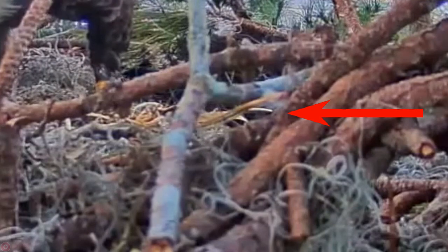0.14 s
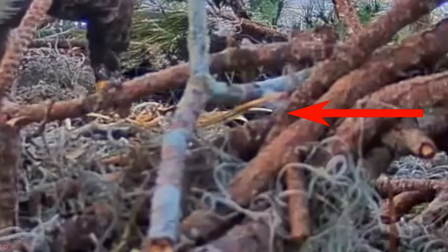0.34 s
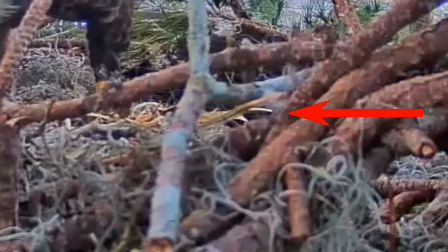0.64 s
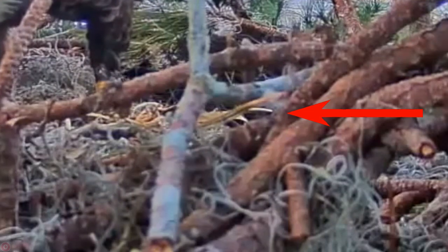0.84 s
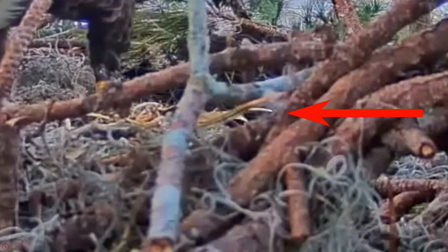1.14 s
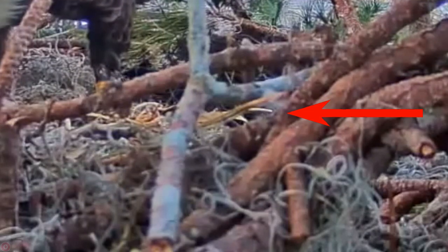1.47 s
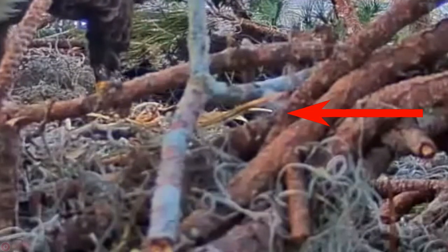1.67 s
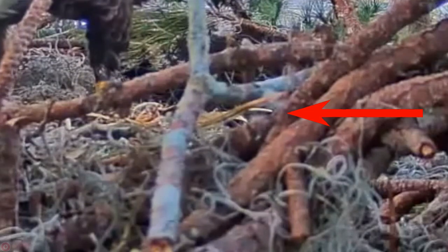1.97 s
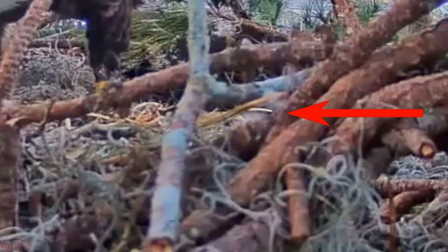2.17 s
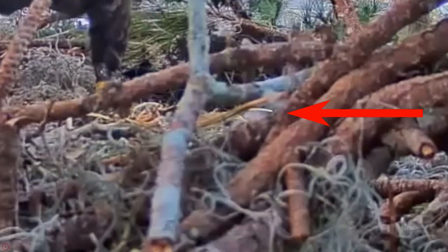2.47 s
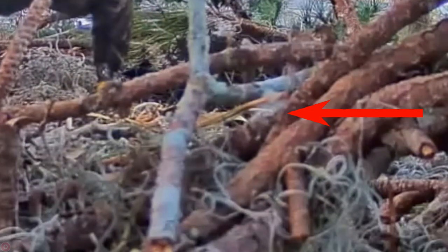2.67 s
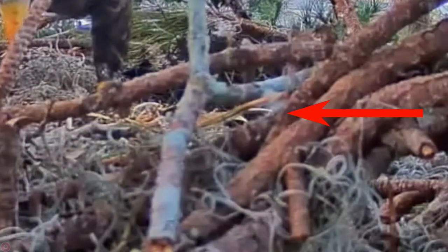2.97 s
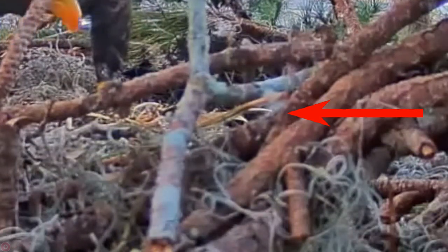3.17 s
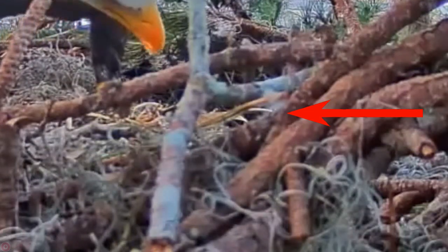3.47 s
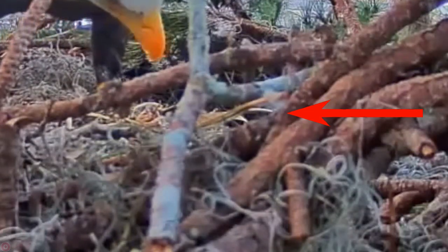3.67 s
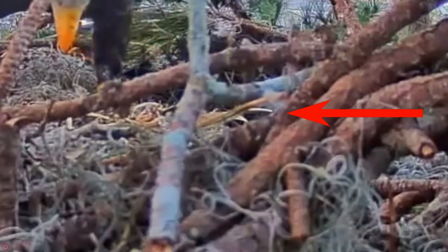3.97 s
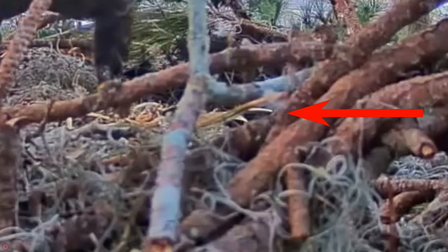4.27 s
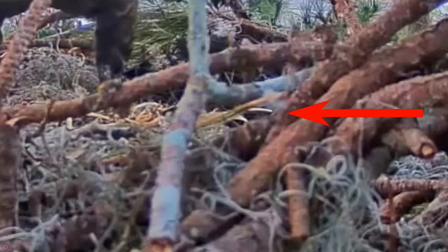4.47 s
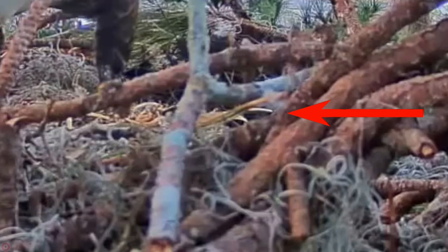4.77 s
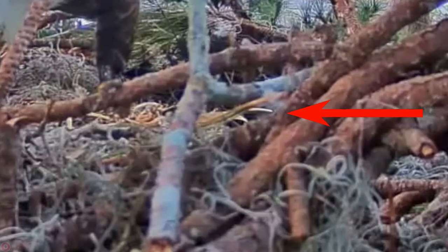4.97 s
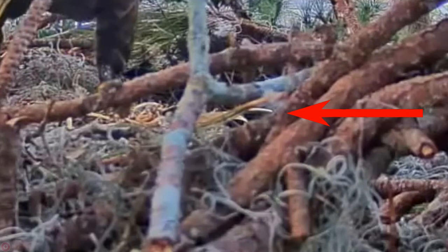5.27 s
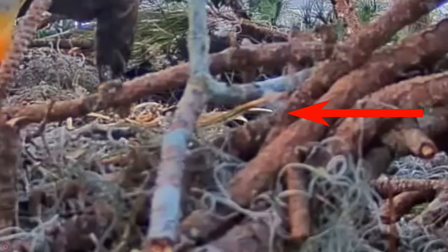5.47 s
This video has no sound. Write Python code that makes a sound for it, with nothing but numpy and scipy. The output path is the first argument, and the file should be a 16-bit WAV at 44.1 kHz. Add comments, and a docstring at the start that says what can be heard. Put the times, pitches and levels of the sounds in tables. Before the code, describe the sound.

Close to a fixed microphone in a big stick nest outdoors, a parent eagle's feet thump low and soft while sticks creak. A chick peeps high near one second, twigs snap in a cluster past two, then come a tiny chirp and two clearer peeps. A faint motor hums far off.

```python
"""In a big stick nest, close to a fixed microphone, a parent's feet thump from the start: damped low swings.
Sticks creak and the lining rustles (coloured noise); twigs snap (ringing bursts), thickest near 2.2 s.
An eaglet, a gliding whistle with overtones, peeps at 1.1 s, briefly at 3.2 s, then at 4.2 s and 5.1 s.
Under it all lie faint outdoor air (noise) and a far motor's hum (a wavering tone in a drone), which
swells near 4.4 s."""
import sys
import numpy as np
from scipy import signal
from scipy.fft import rfft, irfft, next_fast_len
from scipy.io import wavfile
from scipy.ndimage import map_coordinates

SR = 44100
rng = np.random.default_rng(int(sys.argv[2]) if len(sys.argv) > 2 else 0)


def store_wav(level_fs):
    """Save 16-bit WAV to argv[1]."""
    pcm = np.round(np.clip(np.atleast_2d(level_fs), -1, 1) * 32767)
    wavfile.write(sys.argv[1], SR, pcm.T.astype(np.int16))


N = 247842
TIME = np.arange(N) / SR   # s

# One list per peep, a point at each turn of the pitch: [t/s, pitch f/Hz, effort level/dB before the throat]
PEEP_TURNS = [
    [(1.071, 2640, -57), (1.100, 3040, -46.5), (1.165, 3280, -44), (1.215, 3420, -40.5),
     (1.240, 3372, -41.5), (1.268, 3518, -41), (1.292, 3490, -43), (1.326, 3723, -40.5),
     (1.345, 3600, -42.5), (1.375, 3530, -42), (1.398, 3324, -42.5), (1.430, 2700, -51)],
    [(3.164, 2400, -67.5), (3.182, 2646, -58.5), (3.212, 2904, -44), (3.242, 2590, -60.5),
     (3.266, 2130, -91.5)],
    [(4.243, 2850, -42), (4.256, 2564, -60), (4.272, 2785, -41.5), (4.315, 3087, -41.5), (4.385, 3486, -43),
     (4.430, 3577, -47), (4.467, 4004, -49), (4.490, 3796, -49.5), (4.526, 4286, -30), (4.555, 3787, -44.5),
     (4.577, 3036, -53.5), (4.603, 2645, -57.5)],
    [(5.078, 2850, -45), (5.125, 3187, -42.5), (5.158, 3460, -41.5), (5.195, 3373, -42),
     (5.238, 3875, -47.5), (5.287, 3460, -42.5), (5.312, 3780, -43.5), (5.329, 4130, -46),
     (5.365, 3450, -42), (5.388, 3382, -40.5), (5.418, 3030, -48.5), (5.436, 2320, -71)],
]
# Throat and beak response: [f/Hz, level/dB]
THROAT_RESPONSE = [(2200, 18), (2900, -9.5), (3450, 1.5), (3800, 5), (4300, -10.5), (5200, -14.5),
                   (6000, -16.5), (7000, -10), (7700, -1), (8500, -8), (9500, -19.5), (11000, -19),
                   (12500, -49.5)]
# First, second and third harmonic before the throat: [level/dB]
HARMONIC_LEVELS = [0.5, -4, -10]
# Scatter of the call, first in the sticks, then in the tree crown: [level/dB, t60 t/s]
SCATTER_TAILS = [(-19, .04), (-36, .25)]
# Footfalls and shoves on the nest: [start t/s, peak level/dB before grit and filters, swing f/Hz, high if hard]
FOOTFALLS = [(0.043, -34.5, 60), (0.062, -31, 113), (0.165, -23.5, 134.6), (0.338, -37.5, 36.7),
             (0.373, -34, 75.6), (0.424, -31.5, 37), (0.532, -35.5, 38.8), (0.665, -39.5, 49),
             (0.867, -38.5, 62), (1.168, -30.5, 39.8), (1.235, -21.5, 91.4), (1.328, -25, 27.7),
             (1.356, -23, 60.3), (1.376, -24.5, 25.4), (1.406, -30.5, 30.3), (1.458, -34, 62.4),
             (1.813, -31.5, 62.6), (1.886, -32.5, 25.15), (1.914, -31, 34.4), (2.231, -28.5, 63),
             (2.328, -22, 67), (2.417, -21.5, 36.8), (2.436, -28, 33.6), (2.603, -29, 67),
             (2.640, -25.5, 88.4), (2.761, -29, 38.9), (2.829, -34, 43.2), (2.878, -34, 80.7),
             (2.933, -27, 120), (3.057, -26.5, 124), (3.066, -24, 67.2), (3.309, -28.5, 41.2),
             (3.443, -23, 73), (3.525, -23, 55.2), (3.987, -40.5, 40.6), (4.033, -42.5, 109.2),
             (4.18, -36.5, 93.4), (4.196, -39.5, 129), (4.792, -26, 106.7), (5.116, -27, 47.3)]
# The parent leans on the sticks: [start t/s, length t/s, level/dB before the common creak gain]
LEAN_EVENTS = [(0.03, 0.18, -67.5), (0.34, 0.06, -60.5), (0.49, 0.065, -69.5), (0.66, 0.099, -70.5),
               (1.04, 0.14, -69.5), (1.16, .13, -55), (1.33, 0.095, -55.5), (1.88, 0.11, -65.5),
               (2.23, 0.16, -57), (2.33, 0.13, -54), (2.61, .18, -59), (2.84, 0.21, -61.5),
               (3.06, 0.047, -53), (3.12, 0.088, -62.5), (3.41, 0.15, -58.5), (3.53, 0.074, -67),
               (4.77, 0.1, -73.5)]
# Colour of the creaking: [f/Hz, relative level/dB per Hz]
CREAK_COLOUR = [(20, -2.5), (45, -5), (100, 2.5), (200, -11.5), (330, -12.5), (500, -28), (750, -30),
                (1100, -44), (1800, -55.5), (3000, -84)]
# Twigs snapping: [start t/s, body level/dB, crack level/dB, decay t/s]
TWIG_SNAPS = [(0.533, -74.5, -81, 0.011), (0.923, -65, -59, 0.0068), (1.09, -64, -84, 0.0021),
              (1.155, -62, -50, 0.0021), (1.633, -53.5, -61, 0.00055), (1.642, -53.5, -48, 0.00087),
              (2.193, -67.5, -54, .006), (2.214, -87, -60.5, 0.0063), (2.259, -70, -55.5, 0.00375),
              (2.281, -54, -36.5, 0.002), (2.285, -43, -41.5, 0.003), (2.302, -68, -54.5, .003),
              (2.343, -105, -66.5, 0.028), (2.395, -76, -64, 0.0082), (3.46, -100, -67, 0.011),
              (4.076, -78.5, -56, 0.0012)]
# Low modes of a twig: [f/Hz, width f/Hz, relative level/dB]
TWIG_LOW_MODES = [(674, 99, 2), (1590, 49, 1), (2300, 280, 5), (3770, 540, 1)]
# High modes of a twig: [f/Hz, width f/Hz, relative level/dB]
TWIG_HIGH_MODES = [(6290, 1200, -2.5), (9040, 1500, 9.5), (10900, 3860, 1.5)]
# Brushes against the dry lining: [start t/s, length t/s, level/dB]
BRUSH_EVENTS = [(0.0, .14, -88.5), (0.5, 0.091, -79), (1.05, .12, -84.5), (1.52, 0.17, -86),
                (2.01, .025, -80.5), (2.15, .09, -75.5), (2.24, 0.094, -67.5), (3.1, 0.075, -82),
                (3.775, 0.018, -84), (4.2, 0.057, -80), (4.93, 0.41, -83), (5.42, .04, -80.5)]
# Colour of the dry lining: [f/Hz, relative level/dB per Hz]
LINING_COLOUR = [(1500, -7.5), (4000, -2), (5500, -4.5), (7500, -1), (9500, -2), (12000, -8), (13200, -19),
                 (15500, -21.5)]
# Course of the hum: [t/s, tone level/dB before its swell, level/dB of the low drone around it]
HUM_COURSE = [(0, -67, -85.5), (2.1, -72.5, -92), (4.0, -71.5, -83.5), (4.4, -63, -72), (4.9, -69, -79),
              (5.62, -69.5, -75)]
# Colour of the drone: [f/Hz, relative level/dB per Hz]
DRONE_COLOUR = [(90, -18.5), (140, -1.5), (210, -1.5), (350, -17), (550, -19), (1200, -33.5), (2500, -41)]
# Colour of the outdoor air: [f/Hz, relative level/dB per Hz]
AIR_COLOUR = [(25, 9), (100, 1), (250, -27), (600, -35), (1200, -36), (4000, -45.5), (7000, -77),
              (11500, -50), (13200, -60.5), (16000, -70)]


def eaglet(strain=1.1, edge_s=0.0088, jitter=.005, shimmer_db=.7, waver_hz=300):
    """A nearly pure whistle whose overtones swell as they glide through the throat resonances."""
    out = np.zeros(N)
    # jitter is a fraction of the pitch; both spreads are set before the smoothing
    unsteady = jitter * cut(drift(waver_hz), 2 * waver_hz, "low")
    flutter_db = shimmer_db * cut(drift(waver_hz), 2 * waver_hz, "low")
    for peep in PEEP_TURNS:
        s, pitch, effort_db = np.transpose(peep)
        on = (TIME > s[0]) & (TIME < s[-1])
        t = TIME[on]
        turn = np.interp(t, s, np.arange(len(s)))
        hz = map_coordinates(pitch, [turn], order=2, mode="nearest")   # muscles round off each turn
        tension = (hz / 3500) ** strain   # high notes are rougher
        phase = 2 * np.pi * np.cumsum(hz * (1 + tension * unsteady[on])) / SR
        to_edge = np.minimum(t - s[0], s[-1] - t)
        opening = 1 - np.exp(-to_edge / edge_s)
        level_db = np.interp(t, s, effort_db) + tension * flutter_db[on]
        for k, harmonic_db in enumerate(HARMONIC_LEVELS, 1):
            gain = from_db(level_db + harmonic_db + at_hz(THROAT_RESPONSE, k * hz))
            # overtones start later and stop sooner
            out[on] += opening ** k * gain * np.sin(k * phase)
    return out


def nest(x):
    """The sticks scatter the call briefly and the tree crown adds a faint tail."""
    age = TIME[:SR // 3]
    decay = np.zeros(len(age))
    for db, t60 in SCATTER_TAILS:
        unit_energy = np.sqrt(2 * np.log(1000) / (t60 * SR))
        decay += from_db(db - 60 * age / t60) * unit_energy
    return x + signal.fftconvolve(x, decay * rng.standard_normal(len(age)))[:N]


def thumps(damping=0.36, padding=0.53, grit=0.031, grit_hz=600, rattle_hz=380, rattle_s=0.0035, wood_hz=900):
    """Each shove swings the sticks about once; slow shoves also slide and grate; mostly lows get through."""
    out, grating = np.zeros(N), drift(grit_hz)
    for s, db, hz in FOOTFALLS:
        start = int(s * SR)
        angle = 2 * np.pi * hz * TIME[:min(N - start, SR // 5)]
        span = slice(start, start + len(angle))
        onset = 1 - np.exp(-angle / padding)   # the soft lining eases the start
        swing = np.exp(-damping * angle) * np.sin(angle) * onset
        grate = 1 + grit * 40 / hz * grating[span]
        out[span] -= from_db(db) * swing / swing.max() * grate
    # the upper part of a knock arrives along many paths through the sticks
    age = TIME[:SR // 30]
    paths = np.exp(-age / rattle_s) * rng.standard_normal(len(age))
    paths /= np.linalg.norm(paths)
    rattle = signal.fftconvolve(cut(out, rattle_hz, "high", order=4), paths)[:N]
    return cut(out, rattle_hz, "low", order=4) + cut(rattle, wood_hz, "low")


def creaking(gain_db=7, rest_db=-78, after_thump_db=-26, lumpy_db=3.5, lump_hz=45, side_db=-18):
    """Uneven low grumble of the loaded sticks: it lasts through each lean and settles after each footfall."""
    jolts = [(s, 0, db + after_thump_db) for s, db, _ in FOOTFALLS]
    leaning = swells(LEAN_EVENTS, attack_s=0.02, release_s=.012)
    settling = swells(jolts, attack_s=0.0027, release_s=0.035)
    # the sticks are never quite still; gain_db lifts rest, leans and jolts alike
    load = np.sqrt(from_db(rest_db) ** 2 + leaning + settling)
    lumps = rms_one(from_db(lumpy_db * drift(lump_hz)))
    grumble = spread(noise(CREAK_COLOUR), from_db(side_db) * noise(CREAK_COLOUR))
    return from_db(gain_db) * load * lumps * grumble


def twigs(rise_s=0.0024, top_hz=14000):
    """A brief burst of breaking fibres rings a twig's low and high modes, differently on each side."""
    body, crack = np.zeros((2, N))
    age = TIME[:SR // 10]
    for s, body_db, crack_db, decay_s in TWIG_SNAPS:
        start = int(s * SR)
        span = slice(start, start + len(age))
        burst = (1 - np.exp(-age / rise_s)) * np.exp(-age / decay_s)
        burst /= burst.max()
        body[span] += from_db(body_db) * burst
        crack[span] += from_db(crack_db) * burst
    out = np.zeros((2, N))
    for force, modes in ((body, TWIG_LOW_MODES), (crack, TWIG_HIGH_MODES)):
        fibres = rng.standard_normal((2, N))
        steady_level = resonate(fibres, modes).std()
        out += resonate(force * fibres, modes) / steady_level
    return cut(out, top_hz, "low")


def rustle(rest_db=-95, grain_db=4, grain_hz=130, side_db=-4):
    """Dry moss and grass crackle in small clumps whenever they are brushed."""
    brushing = swells(BRUSH_EVENTS, attack_s=0.013, release_s=0.0065)
    stir = np.sqrt(from_db(rest_db) ** 2 + brushing)
    clumps = rms_one(from_db(grain_db * drift(grain_hz)))
    return stir * clumps * spread(noise(LINING_COLOUR), from_db(side_db) * noise(LINING_COLOUR))


def hum(centre_hz=140, waver=0.0086, waver_hz=6, swell_db=2, drone_side_db=-10):
    """A far motor: one tone, wavering in pitch and level, in a dull drone."""
    tone_db, drone_db = in_time(HUM_COURSE)
    phase = 2 * np.pi * np.cumsum(centre_hz * (1 + waver * drift(waver_hz))) / SR
    tone = np.sqrt(2) * from_db(tone_db + swell_db * drift(waver_hz)) * np.sin(phase)
    drone = spread(noise(DRONE_COLOUR), from_db(drone_side_db) * noise(DRONE_COLOUR))
    return tone + from_db(drone_db) * drone


def air(mid_db=-66, side_db=-9):
    """Faint outdoor background as steady coloured noise; side_db is relative to the middle."""
    return from_db(mid_db) * spread(noise(AIR_COLOUR), from_db(side_db) * noise(AIR_COLOUR))


def swells(rows, attack_s, release_s):
    """Power of events (start, length, dB) that rise, hold and die away."""
    power = np.zeros(N)
    for s, length, db in rows:
        first = max(int((s - attack_s / 2) * SR), 0)
        on = slice(first, int((s + length + 8 * release_s) * SR))
        age = TIME[on] - s
        rise = np.clip(.5 + age / attack_s, 0, 1)
        fall = np.exp(-np.maximum(age - length, 0) / release_s)
        power[on] += (from_db(db) * rise * fall) ** 2
    return power


def resonate(x, modes):
    """Parallel resonances with alternating signs."""
    out = 0
    for k, (hz, width, db) in enumerate(modes):
        b, a = signal.iirpeak(hz, hz / width, fs=SR)
        out = out + (-1) ** k * from_db(db) * signal.lfilter(b, a, x)
    return out


def noise(spectrum):
    """Noise of a given colour, fading below 20 Hz; rms 1."""
    size = next_fast_len(N, real=True)
    hz = np.fft.rfftfreq(size, 1 / SR) + 1   # off zero for the log axis
    gain = from_db(at_hz(spectrum, hz)) * np.minimum(hz / 20, 1) ** 2
    return rms_one(irfft(rfft(rng.standard_normal(size)) * gain, size)[:N])


def drift(rate_hz):
    """Random wavering up to about this rate; spread 1."""
    size = 2 ** 18
    hz = np.fft.rfftfreq(size, 1 / SR)
    slowed = rfft(rng.standard_normal(size)) / (1 + (hz / rate_hz) ** 2)
    return rms_one(irfft(slowed)[:N])


def spread(mid, side):
    """Left and right from middle and side."""
    return np.array([mid + side, mid - side])


def cut(x, hz, kind, order=2):
    """Butterworth low- or high-pass."""
    sos = signal.butter(order, min(hz, .45 * SR), kind, fs=SR, output="sos")
    return signal.sosfilt(sos, x)


def at_hz(points, hz):
    """Read a spectrum on a log-frequency axis."""
    point_hz, point_db = np.transpose(points)
    return np.interp(np.log(hz), np.log(point_hz), point_db)


def in_time(rows):
    """Each column of a curve, sample by sample."""
    s, *columns = np.transpose(rows)
    return [np.interp(TIME, s, c) for c in columns]


def rms_one(x):
    """Scale to unit power."""
    return x / np.sqrt(np.mean(x ** 2) + 1e-20)


def from_db(db):
    """Decibels to gain."""
    return 10 ** (np.asarray(db) / 20)


def scene():
    """The chick and the thumps are central; twigs and lining spread wide."""
    return nest(eaglet()) + thumps() + creaking() + twigs() + rustle() + hum() + air()


def record(dry):
    """The microphone passes no steady pressure; the top is cut steeply at 15.7 kHz."""
    moving = cut(dry, 10, "high", order=1)
    # order 10, ripple 0.1 dB, stopband 70 dB down
    steep = signal.ellip(10, .1, 70, 15700, fs=SR, output="sos")
    return signal.sosfilt(steep, moving)


dry = scene()
out = record(dry)
store_wav(out)
```